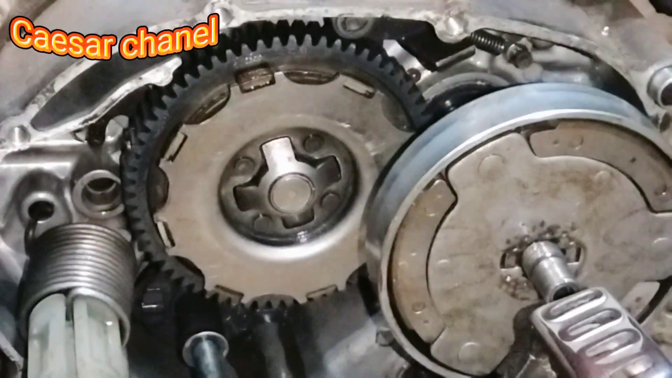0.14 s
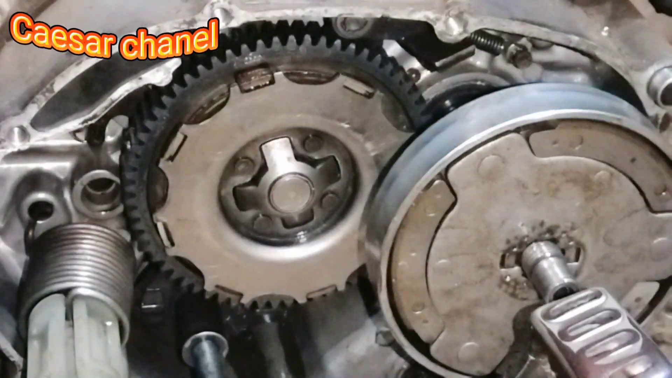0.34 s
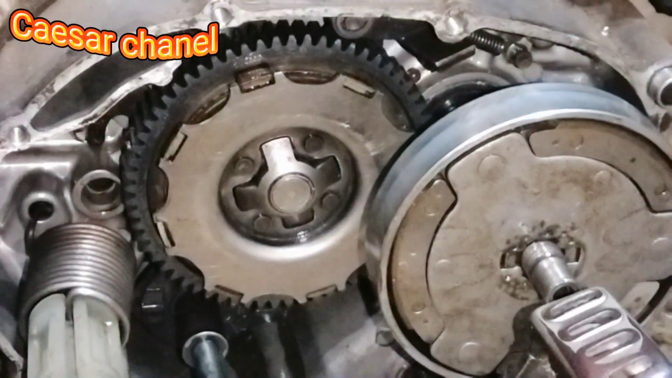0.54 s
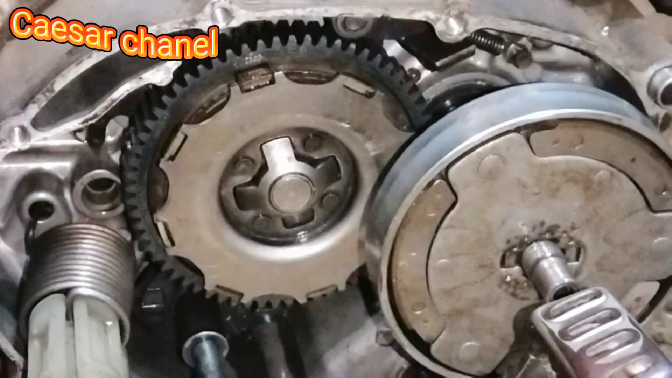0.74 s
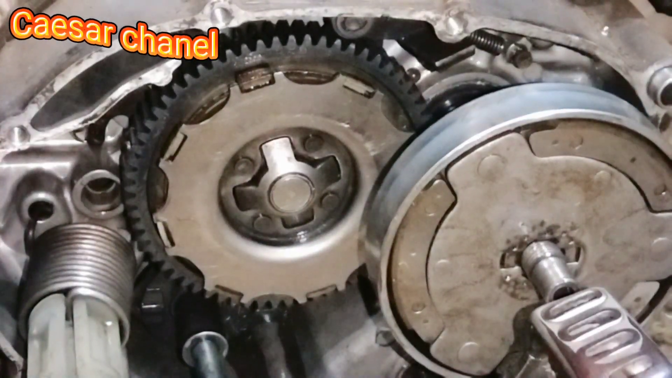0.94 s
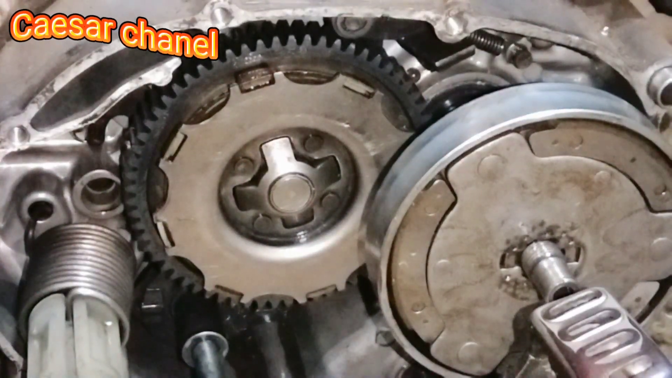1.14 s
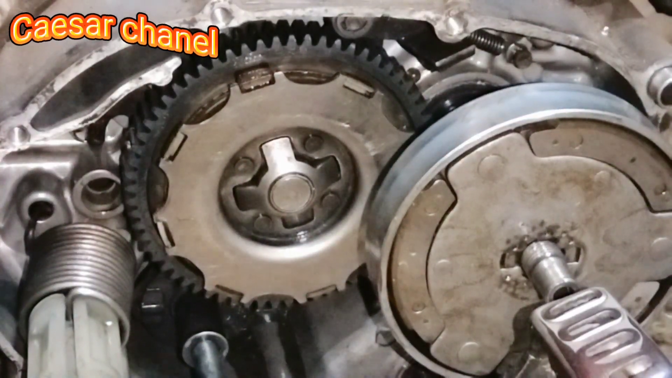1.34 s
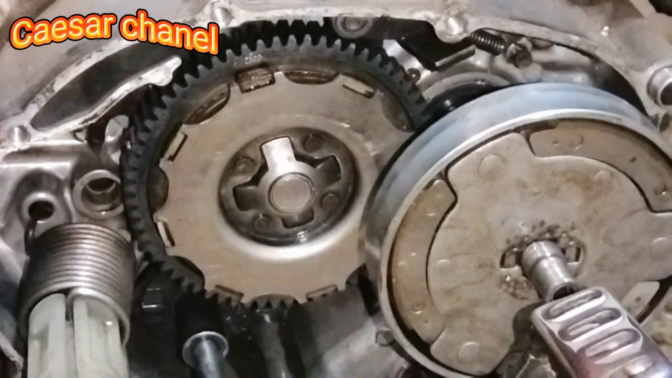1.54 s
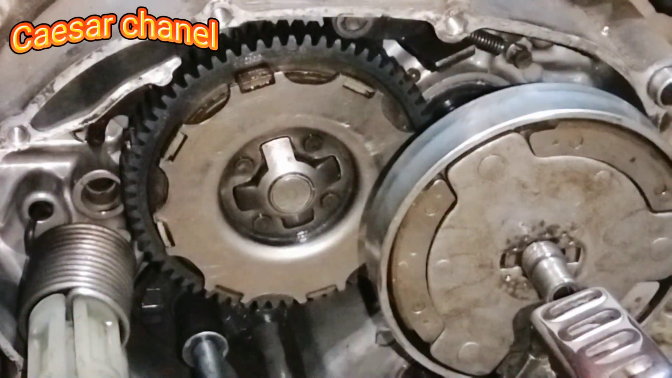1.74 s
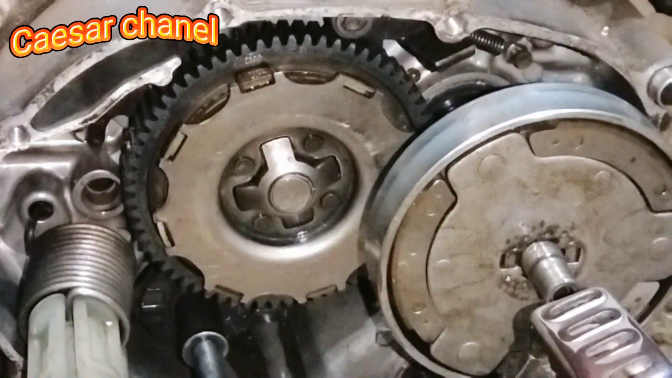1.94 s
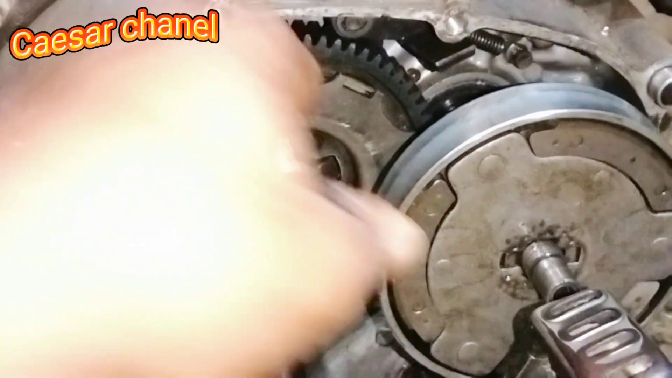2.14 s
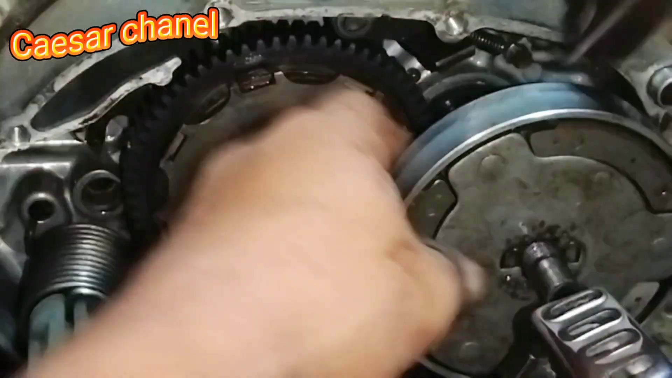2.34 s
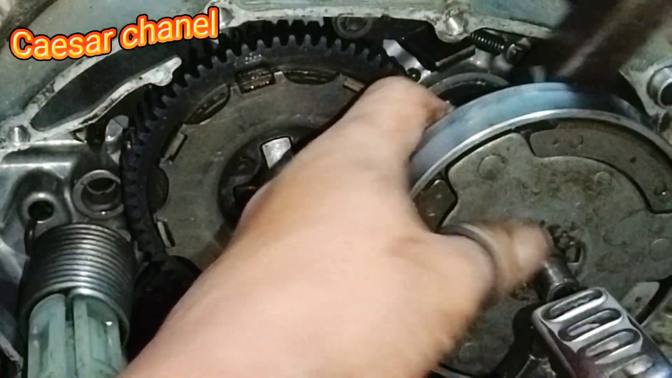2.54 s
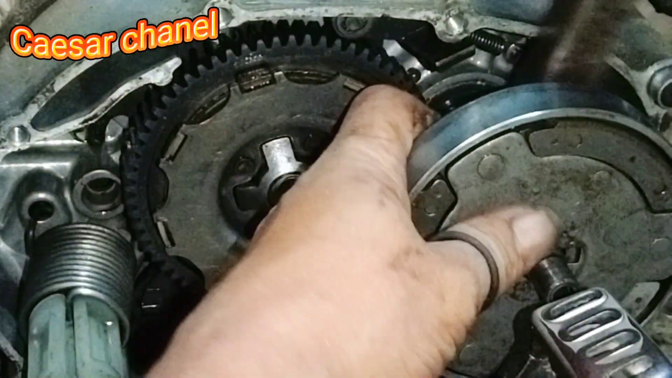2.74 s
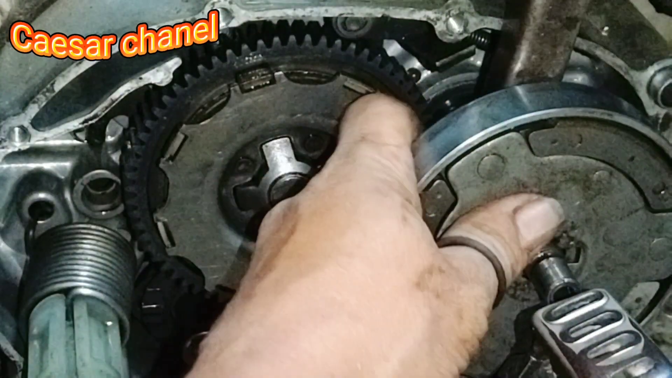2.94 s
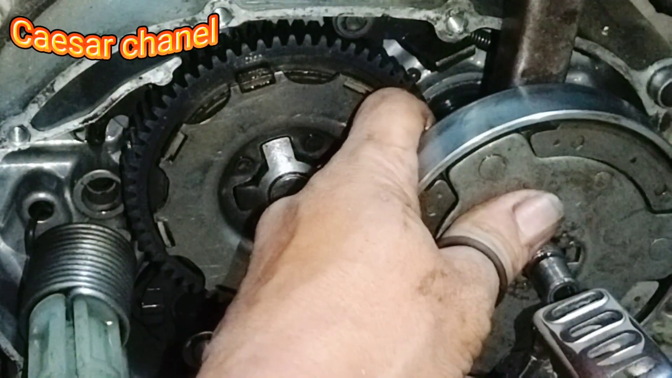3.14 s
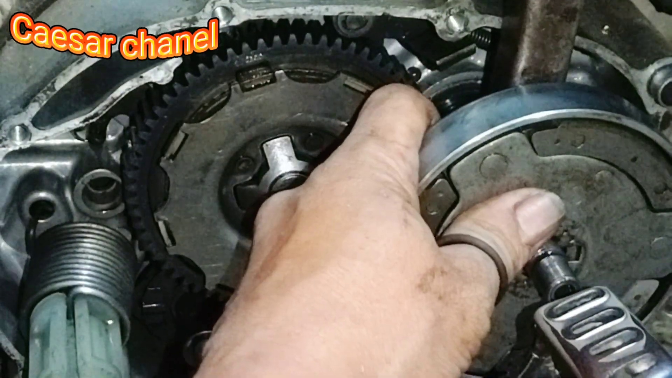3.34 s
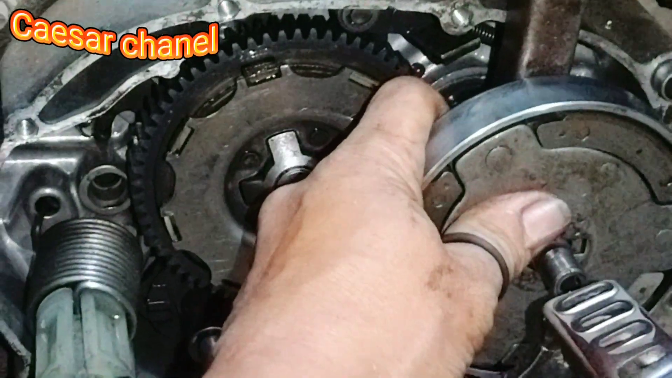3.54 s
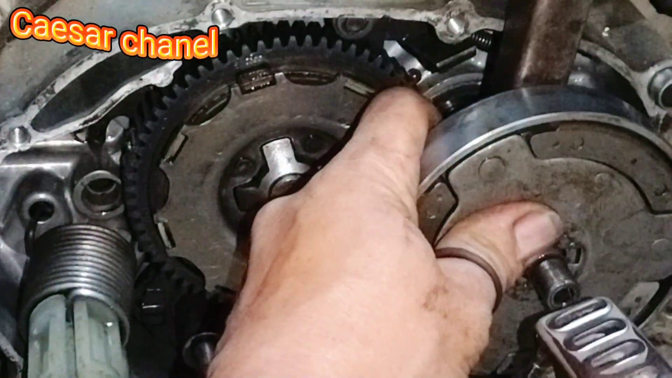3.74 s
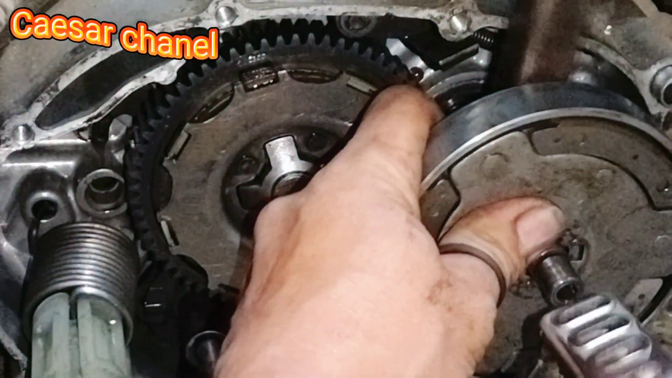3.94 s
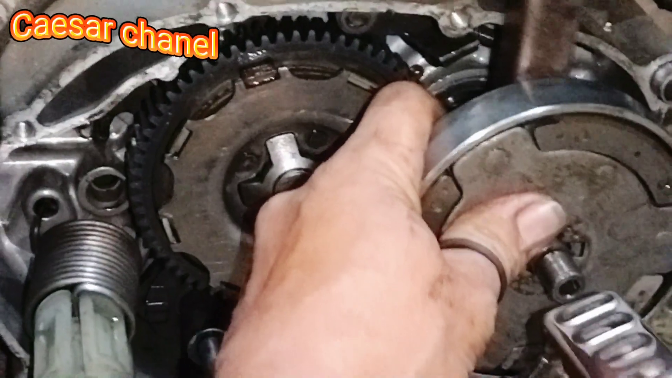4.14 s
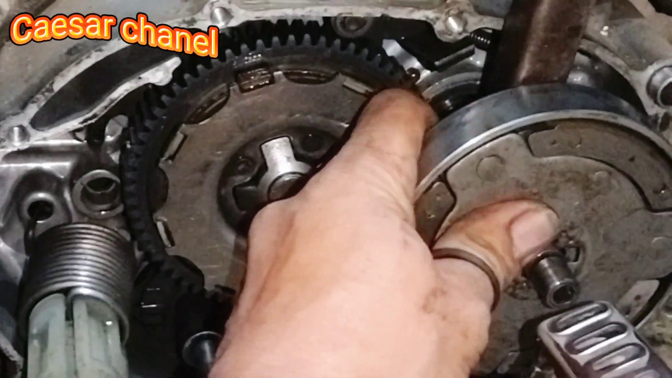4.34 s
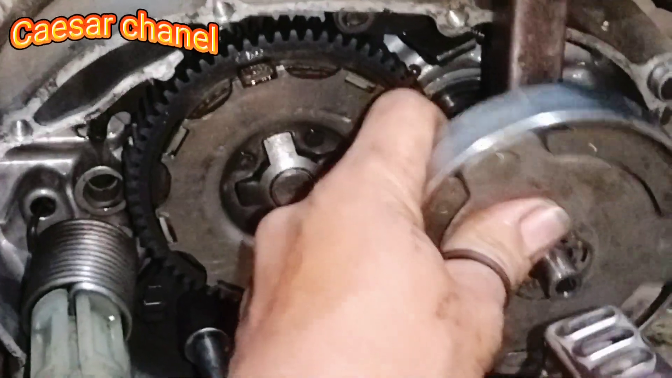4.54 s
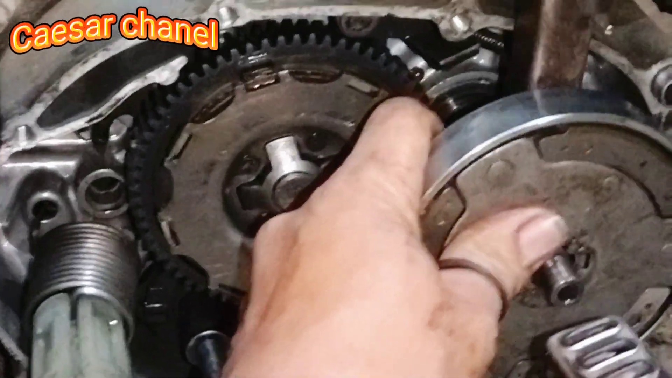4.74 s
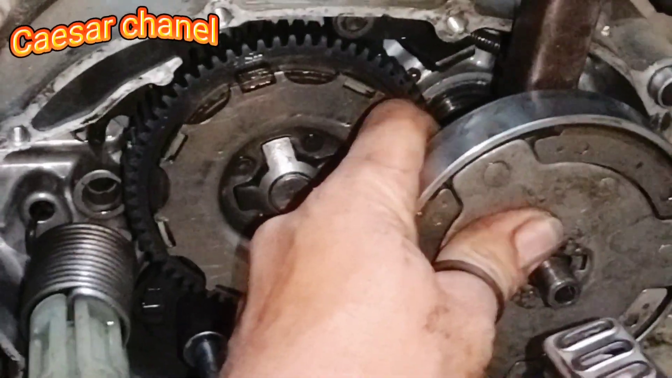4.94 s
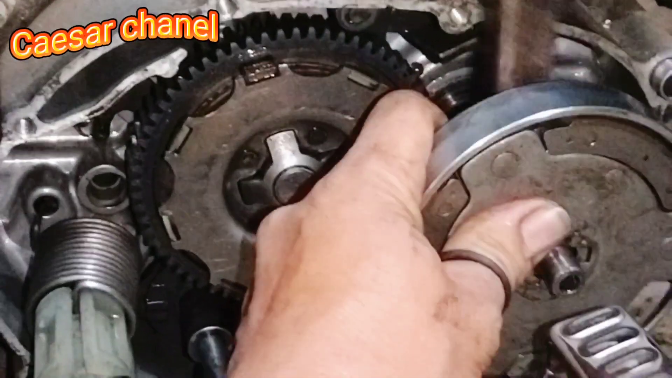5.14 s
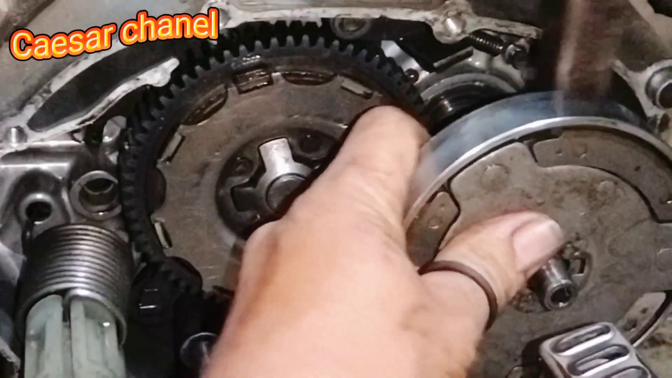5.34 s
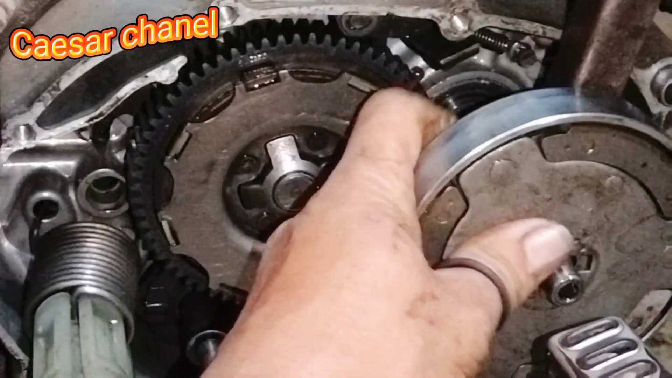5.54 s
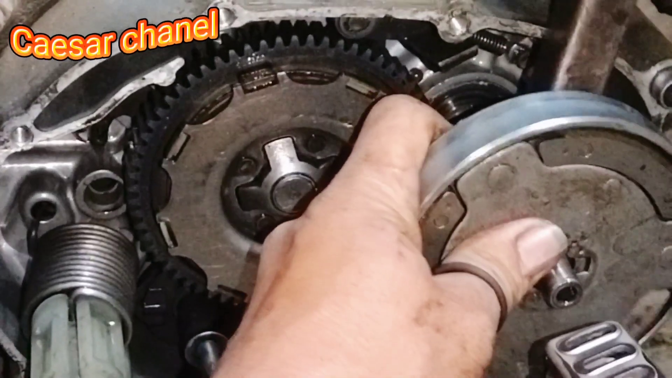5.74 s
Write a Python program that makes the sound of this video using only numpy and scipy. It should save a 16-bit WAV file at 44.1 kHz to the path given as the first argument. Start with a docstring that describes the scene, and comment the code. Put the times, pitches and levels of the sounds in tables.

```python
"""A hand and a steel lever work a clutch drum loose on an opened motorcycle engine: modal knocks and clinks.
Slips drive the drum modes as steel rubs; coloured noise makes drags, shuffles and rustling sleeves.
Further off in the shed a dropped tool is noise bursts through resonances; outside, a cricket is swelling band noise.
Faint noise streaks surface, low bumps push the microphone, and air noise lies beneath.
A phone's noise suppressor hushes the shed between the sounds."""
import sys
import numpy as np
from scipy import signal
from scipy.fft import rfft, irfft, next_fast_len
from scipy.io import wavfile
from scipy.ndimage import uniform_filter1d, minimum_filter1d, map_coordinates

SR = 44100
rng = np.random.default_rng(int(sys.argv[2]) if len(sys.argv) > 2 else 0)


def transcribe(signal):
    """Save signal, clipped to [-1, 1], as a 16-bit WAV file at the path in sys.argv[1]."""
    frames = np.atleast_2d(signal).T
    limited = np.clip(frames, -1, 1)
    pcm = np.round(limited * 32767).astype(np.int16)
    wavfile.write(sys.argv[1], SR, pcm)


N = 259899
TIME_S = np.arange(N) / SR

# Contacts of lever, drum and shaft. Each row: start in seconds, then relative levels in dB of clack, case thud,
# low drum ring, high drum ring and tick, then grip (0-1).
CONTACTS = [(2.541, -52, -55, -34.5, -29, -37, 0.44), (2.565, -48.5, -42.5, -48, -51, -68, 0.02),
            (2.599, -54, -41.5, -51, -53, -48, 0.28), (2.638, -51, -44.5, -42.5, -42.5, -49, 0.86),
            (2.677, -60.5, -50, -56, -55.5, -54.5, 0.18), (2.768, -57, -46.5, -65.5, -68, -61, 0.4),
            (2.846, -37.5, -42, -59, -61.5, -47, 0.07), (2.896, -67.5, -71, -68, -66, -40, 0),
            (2.962, -54.5, -73, -52.5, -47, -50, 0.1), (3.032, -35, -20, -52, -39.5, -44, 0.96),
            (3.064, -58, -39, -59, -50, -40, 0.7), (3.12, -48.5, -41, -61, -41, -28.5, 0.5),
            (3.168, -62, -70, -61, -49, -59, 0.5), (3.24, -99, -49.5, -50.5, -47, -50, 0.6),
            (3.259, -71, -76.5, -58.5, -58, -50, 0.24), (3.316, -50, -87.5, -54, -82, -67.5, 0.8),
            (3.33, -60, -83.5, -47, -80, -35.5, 0.56), (3.37, -65, -85.5, -60, -72, -65, 0.6),
            (3.422, -59.5, -81, -60.5, -78, -48, 0.6), (3.452, -50, -77.5, -41.5, -60.5, -62.5, 0.8),
            (3.495, -57, -73.5, -61.5, -57, -57.5, 0.73), (3.731, -66, -47.5, -53.5, -61, -94, 0.26),
            (3.758, -59, -40, -63.5, -77, -72.5, 0.3), (3.788, -55.5, -44.5, -66.5, -54, -46, 0.6),
            (3.839, -58, -47.5, -71.5, -64, -71.5, 0.8), (3.995, -69.5, -63, -77, -51, -49.5, 0.44),
            (4.013, -86.5, -45.5, -85, -87, -74.5, 0.3), (4.024, -58.5, -70, -64.5, -56.5, -39, 0.44),
            (4.0977, -35.5, -22.5, -24.5, -48, -39, 0.72), (4.109, -18, -23.5, -38, -30.5, -36, 0.6),
            (4.137, -18.5, -10, -13.5, -24.5, -19.5, 0.91), (4.139, -16.5, -23.5, -32, -43.5, -41.5, 1),
            (4.238, -26.5, -20, -46.5, -30, -45, 0.86), (4.277, -58, -48, -55.5, -52.5, -49.5, 0.4),
            (4.492, -59, -79.5, -49, -69.5, -72.5, 0.6), (4.598, -22.5, -15, -30, -27, -19.5, 0.66),
            (4.604, -17, -15, -23.5, -39.5, -32.5, 0.24), (4.632, -12.5, -7.5, -36, -24, -30, 0.66),
            (4.643, -8, -22.5, -35, -34, -38, 0.9), (4.755, -27, -21.5, -65, -53, -78, 0.2),
            (4.817, -45, -73, -63, -49, -58, 0.8), (4.889, -29.5, -35, -33, -42.5, -55.5, 0.3),
            (4.939, -59, -61.5, -72, -74, -73, 0.4), (5.101, -63.5, -79.5, -59, -67.5, -55, 0),
            (5.125, -38, -18.5, -66, -40.5, -48.5, 0.25), (5.139, -12, -36.5, -14.5, -33, -27, 0.95),
            (5.157, -19.5, -13.5, 0, -28, -17.5, 1), (5.267, -34.5, -30, -70, -58.5, -57.5, 0.3),
            (5.342, -54, -51, -62, -56, -54.5, 0.6), (5.368, -56, -56, -46, -42.5, -40, 0.3),
            (5.491, -54, -58, -69.5, -40.5, -44.5, 0.34), (5.606, -59, -53, -61, -42, -53.5, 0.8),
            (5.62, -28, -22.5, -30, -63, -98, 0.8), (5.776, -70, -73, -58, -70, -65, 0.9),
            (5.8038, -21.5, -28.5, -39, -31, -39, 0.23), (5.817, -37.5, -27.5, -29, -58, -58, 0.1),
            (5.83, -30, -55, -52, -52, -52, 0.6), (5.861, -40.5, -23.5, -46, -43, -34, 0.9)]
# Modes of drum, engine case and clutch plates. Each row: frequency in Hz, relative level in dB, ungripped t60 in seconds.
DRUM_MODES = [(2330, -14.5, .3), (3970, -12.5, 0.68), (4720, -9.5, 0.15), (4865, -12.5, 0.13),
              (5220, -6.5, 0.38), (6000, -16, .5), (6555, -16.5, .15), (7760, 3, .45), (8120, 3, .5),
              (8764, -4, 0.19), (9500, -5.5, 0.2), (10530, -6, 0.22), (12040, -10, .35), (13400, -7, 0.24),
              (14900, -15.5, 0.32), (14600, -11, .35), (15100, -10.5, 0.23)]
CASE_MODES = [(117, -14, 0.11), (286.1, -8, 0.36), (331, -9.5, 0.1), (397, 0, 0.12), (436, 1, 0.14),
              (512.4, 5, 0.059), (660.5, 1.5, 0.087), (734.7, 0, 0.13), (821.5, -2.5, 0.039)]
PLATE_MODES = [(1011, -11.5, 0.034), (1205, -5.5, 0.25), (1510, 6.5, 0.03), (1667, 11.5, 0.033),
               (1931, 8.5, 0.033), (2167, 8.5, 0.057), (2510, -7, 0.16), (2643, -5, 0.051),
               (3314, -15.5, 0.012)]
# The tool lands and settles. Each row: start in seconds, relative level in dB.
TOOL_BLOWS = [(0.553, -54), (0.564, -38), (0.576, -30), (0.5948, -12.5), (0.597, -19.5), (0.602, -28.5)]
# Tool resonances. Each row: frequency in Hz, width in Hz, level in dB.
TOOL_RESONANCES = [(1180, 43, 18), (1930, 150, 17.5), (2420, 180, -18), (2910, 230, 11), (3760, 580, 1.5),
                   (4318, 700, 4.5), (4770, 220, -1), (6240, 320, 3.5), (6280, 470, -1.5),
                   (7740, 620, -0.5), (9170, 220, -0.5)]
# Noise spectra of gritty drag, cloth, cricket and shed air. Each row: frequency in Hz, relative density in dB per Hz.
DRAG_SPECTRUM = [(88, -65.5), (150, -35.5), (277, -37), (363, -9), (620, -12.5), (1220, -7.5), (1390, -7.5),
                 (1700, -12.5), (2730, -19), (6500, -32), (8450, -53), (14300, -120)]
CLOTH_SPECTRUM = [(1500, -31), (2150, -1.5), (3000, -4.5), (5000, -5.5), (8000, -5), (12000, -10),
                  (15500, -7), (16500, -47.5)]
CRICKET_SPECTRUM = [(6300, -47.5), (6700, -10.5), (6900, -5), (7100, 2), (7350, 0), (7520, -5), (7750, -68)]
AIR_SPECTRUM = [(20, -22.5), (70, 5.5), (150, 3.5), (400, -9), (1000, -11.5), (3000, -15.5), (8000, -22.5),
                (15500, -22.5)]
# The phone's stand is nudged. Each row: time in seconds, relative level in dB.
STAND_NUDGES = [(1.52, -69.5), (1.837, -66), (2.415, -42)]
# Decay of the shed's first tail. Each row: frequency in Hz, t60 in seconds.
SHED_T60 = [(100, 0.88), (500, 0.32), (1400, 0.21), (4000, 0.27), (12000, 0.2)]
# Microphone response. Each row: frequency in Hz, gain in dB.
MIC_RESPONSE = [(30, -25.5), (100, -14), (250, -4.5), (15350, 5), (15750, -24)]
# Cloth rustles. Each row: time of the top, rise and fall in seconds, relative level in dB.
SLEEVE_STROKES = [(.002, .01, 0.15, -63.5), (.214, 0.0084, .1, -72.5), (.36, 0.15, 0.43, -61),
                  (1.842, 0.031, 0.038, -56), (1.955, 0.11, 0.17, -57), (2.08, 0.11, 0.13, -61),
                  (2.97, 0.096, .12, -62.5), (3.14, .02, 0.44, -61), (3.238, .01, 0.035, -52.5),
                  (3.33, 0.012, .1, -56.5), (3.49, 0.0097, .09, -63), (3.794, 0.076, 0.0076, -59.5),
                  (3.832, 0.022, 0.035, -69), (4.05, 0.077, 0.15, -62), (5.38, .1, .05, -68.5),
                  (5.5, 0.18, 0.037, -62), (5.62, 0.073, 0.05, -63.5)]
# Faint narrow noise bands. Each row: start and end in seconds, frequency in Hz, level in dB.
STREAKS = [(0.048, 0.087, 1586, -66.5), (0.136, 0.142, 1586, -55), (0.061, 0.062, 3210, -58),
           (0.127, 0.155, 3160, -67), (0.104, 0.301, 902, -65), (0.167, 0.307, 943, -57),
           (0.172, 0.329, 1358, -61), (0.215, .33, 1853, -58), (0.196, 0.341, 2351, -63.5),
           (0.208, 0.334, 2800, -67.5), (.47, 0.529, 1429, -53.5), (0.383, 0.561, 395, -52.5),
           (0.94, 1.137, 2088, -63), (1.046, 1.11, 1180, -58.5), (1.006, 1.088, 2984, -69.5),
           (1.286, 1.319, 2897, -71), (1.538, 1.56, 785.4, -70.5), (1.65, 1.85, 3300, -74),
           (1.834, 1.915, 433, -64.5), (2.054, 2.193, 2433, -69.5), (1.917, 2.12, 1766, -69.5),
           (2.291, 2.382, 2903, -72), (2.3, 2.467, 1343, -65), (2.315, 2.457, 1742, -69),
           (2.347, 2.428, 688.4, -61), (2.476, 2.55, 781, -59), (3.459, 3.526, 733, -57.5),
           (3.66, 3.73, 2950, -69), (3.966, 4.018, 2966, -70), (3.969, 4.02, 1550, -64.5),
           (4.886, 4.984, 2120, -49.5), (5.262, 5.587, 1007, -53.5)]
# Hand moves sliding part on part. Each row: time of the top, rise and fall in seconds, then relative levels in dB
# of gritty drag, case shuffle, low drum modes and high drum modes.
HAND_STROKES = [(.31, .008, 0.5, -49, -87.5, -93.5, -90.5), (.86, .01, 0.15, -85.5, -62, -72, -57.5),
                (.95, 0.028, .1, -91, -54.5, -63.5, -63.5), (1.05, .08, 0.083, -93, -48.5, -70, -64.5),
                (2.49, .05, .1, -91, -62, -86.5, -88), (2.65, 0.024, 0.21, -57, -54, -62, -54.5),
                (2.77, 0.007, 0.035, -52.5, -67, -66.5, -74), (2.885, 0.012, 0.19, -54, -93.5, -61, -90),
                (2.96, 0.098, 0.15, -57.5, -92.5, -62, -45.5), (3.02, 0.15, 0.2, -50, -86, -64.5, -63.5),
                (3.145, 0.0061, 0.14, -51.5, -90, -76, -75), (3.345, .01, 0.053, -77.5, -90, -92, -75),
                (3.454, 0.0077, 0.12, -58, -93, -84, -85), (3.76, 0.046, 0.09, -61, -55, -88, -69.5),
                (3.832, 0.023, 0.044, -77, -74, -67, -54.5), (4.03, 0.16, 0.23, -64, -60.5, -69, -62.5),
                (4.085, 0.04, 0.051, -64.5, -53.5, -66.5, -66), (4.31, 0.024, 0.28, -56, -67.5, -65, -62),
                (4.49, 0.043, 0.14, -58.5, -100, -68.5, -60), (4.97, 0.022, 0.16, -63, -68, -69, -66.5),
                (5.29, 0.12, 0.043, -44, -45, -64, -56), (5.4, 0.069, 0.17, -50.5, -58, -54, -47),
                (5.49, 0.032, .05, -61, -53, -58, -74), (5.6, 0.039, .03, -58, -51, -67, -48),
                (5.68, .02, 0.21, -54.5, -61.5, -80, -65)]
# Drum modes singing on alone. Each row: start and length in seconds, frequency in Hz, level in dB.
SINGING_MODES = [(1.06, .13, 4680, -72), (5.37, .2, 4700, -55), (5.37, .24, 5200, -58),
                 (5.46, .158, 3985, -55), (5.795, .11, 4740, -44)]

TOP_HZ = 16670
CRICKET_RATE_HZ, CRICKET_PEAK_S = 8.6, .113
STROKE_ROUNDNESS = 1.32  # 1 pointed, 2 bell-shaped
MUFFLE_DB_PER_GRIP, CASE_GRIP_DB_PER_S = 9, 150  # drum level loss and added case decay, per unit of grip
HARD_CLACK_DB, STOP_DB_PER_S = -35, 900  # any later clack above this level stills what was ringing


def amp(db):
    """dB to gain."""
    return 10 ** (np.asarray(db) / 20)


def unit(x):
    """Scales to rms 1."""
    return x / np.sqrt(np.mean(x ** 2) + 1e-20)


def along(points, hz):
    """Interpolates (Hz, value) points on a log axis."""
    f, v = np.transpose(points)
    return np.interp(np.log(hz + 1), np.log(f + 1), v)


def wobble(rate_hz):
    """A smooth random curve with rate_hz knots a second."""
    knots = rng.standard_normal(int(N * rate_hz / SR) + 4)
    return map_coordinates(knots, [TIME_S * rate_hz])


def filtered(x, response):
    """x times a complex response of frequency."""
    m = next_fast_len(N + SR // 2)
    spectrum = rfft(x, m) * response(np.fft.rfftfreq(m, 1 / SR))
    return irfft(spectrum, m)[..., :N]


def hiss(spectrum):
    """Coloured noise of rms 1."""
    return unit(filtered(rng.standard_normal(N), lambda hz: amp(along(spectrum, hz))))


def resonances(peaks):
    """Causal response of (Hz, width Hz, dB) resonances in alternating polarity."""
    def response(f):
        total = 0
        for k, (center, width, db) in enumerate(peaks):
            band = 1j * f * width / (center * center - f * f + 1j * f * width)
            total = total + (-1) ** k * amp(db) * band
        return total
    return response


def ring(modes, t, scatter_db, detune, damping=0, extra_db=0):
    """One blow: decaying modes with random strength and slight random detuning."""
    hz, db, t60 = np.transpose(modes)[:, :, None]
    chance = rng.standard_normal((2, len(modes), 1))
    level_db = db + extra_db + scatter_db * chance[0] - 60 * t * (1 / t60 + damping)
    tones = np.sin(2 * np.pi * hz * (1 + detune * chance[1]) * t)
    return np.sum(amp(level_db) * tones, axis=0) / np.linalg.norm(amp(db))


def strokes(rows):
    """One gain curve per level column; each stroke is 20 dB down one rise before and one fall after its top."""
    s, rise, fall, *db = np.transpose(rows)[:, :, None]
    away = np.maximum((s - TIME_S) / rise, (TIME_S - s) / fall)
    shape = amp(-20 * np.minimum(away, 10) ** STROKE_ROUNDNESS)
    return np.max(amp(db) * shape, axis=1)


def add(track, s, x):
    """Mixes x into track from time s."""
    part = track[round(s * SR):][:len(x)]
    part += x[:len(part)]


def shed(x):
    """Each frequency of the shed's answer dies at its own speed; each quarter second gets a new tail."""
    out, hop = np.zeros(N), SR // 4
    for start in range(0, N, hop):
        hz, t, z = signal.stft(rng.standard_normal(SR // 2), SR, nperseg=256)
        fall_db = 60 * t / along(SHED_T60, hz)[:, None]
        decay = amp(-fall_db) + amp(-22 - 0.3 * fall_db)  # the roof space rings on, weaker and longer
        tail = signal.istft(z * decay, SR, nperseg=256)[1]
        tail = tail / np.linalg.norm(tail)
        add(out, start / SR + .006, signal.fftconvolve(x[start:start + hop], tail))
    return out


def air():
    """Steady coloured noise of the shed air."""
    return amp(-64.0) * hiss(AIR_SPECTRUM)


def cricket():
    """A rough trill in one narrow band that swells and sinks steadily."""
    swell = np.cos(2 * np.pi * CRICKET_RATE_HZ * (TIME_S - CRICKET_PEAK_S))
    return amp(-64.5 + 4.6 * swell + .6 * wobble(3)) * hiss(CRICKET_SPECTRUM)


def streaks():
    """Each streak is a wavering band about 100 Hz wide with a quick start and a slow fade, then a fast cut."""
    out = np.zeros(N)
    for start, end, hz, db in STREAKS:
        t = np.arange(round((end - start + 0.014) * SR)) / SR
        slow = rng.standard_normal((2, len(t)))
        slow = uniform_filter1d(uniform_filter1d(slow, size=260), size=260)
        band = unit(slow[0] * np.cos(2 * np.pi * hz * t) + slow[1] * np.sin(2 * np.pi * hz * t))
        fade_db = -6 * t / (end - start) - 410 * np.maximum(t - end + start, 0)
        shape = (1 - np.exp(-t / 0.0012)) * amp(fade_db)
        add(out, start, amp(db) * shape * band)
    return out


def bumps():
    """Low damped modes push straight into the microphone."""
    out, t = np.zeros(N), np.arange(SR // 4) / SR
    modes = [(64.0, -4.0, 0.31), (109.5, 0.5, 0.15), (146.5, -16.0, 0.31)]  # Hz, dB, t60 s
    for s, db in STAND_NUDGES:
        push = ring(modes, t, 0.97, detune=0.021)
        onset = 1 - np.exp(-(t / 0.011) ** 2)
        add(out, s - .008, amp(db + 22.0) * push * onset)
    return out


def tool():
    """Short rough contacts with the floor excite the tool's resonances over a broad crash."""
    blows, t = np.zeros(N), np.arange(SR // 10) / SR
    for s, db in TOOL_BLOWS:
        add(blows, s, amp(db - 60 * t / 0.037) * rng.standard_normal(len(t)))
    crash = signal.lfilter(*signal.butter(1, [500, 3500], "band", fs=SR), blows)
    body = filtered(blows, resonances(TOOL_RESONANCES)) + amp(4.5) * crash
    return signal.lfilter(*signal.butter(2, 300, "high", fs=SR), body)


def handling():
    """A gritty drag, a dull shuffle through the case and a bright rustle of cloth, all uneven."""
    uneven = amp([2.5 * wobble(80), 3 * wobble(45), 1.2 * wobble(120)])
    drag_gain, shuffle_gain = strokes(HAND_STROKES)[:2]
    drag = drag_gain * amp(1.0) * hiss(DRAG_SPECTRUM)
    hollow = resonances([(hz, 90, db) for hz, db, t60 in CASE_MODES])
    through_case = filtered(filtered(rng.standard_normal(N), hollow), hollow)
    shuffle = shuffle_gain * unit(through_case)
    rustle = strokes(SLEEVE_STROKES)[0] * amp(2.5) * hiss(CLOTH_SPECTRUM)
    return np.sum(uneven * [drag, shuffle, rustle], axis=0)


def singing():
    """Nearly pure drum tones that swell in, waver a little and stop."""
    out = np.zeros(N)
    for start, length, hz, db in SINGING_MODES:
        fade_in = np.clip((TIME_S - start) / 0.015, 0, 1)
        fade_out = np.clip((start + length - TIME_S) / 0.015, 0, 1)
        level = amp(db + 2.5 * wobble(60))
        out += level * fade_in * fade_out * np.sin(2 * np.pi * hz * TIME_S + .6 * wobble(41))
    return out


def rubbing():
    """Steel sliding on the drum: dense tiny slips keep its modes singing and tick in the treble."""
    slips = rng.standard_normal(N) * amp(5.5 * wobble(220))
    modes = [(hz, 4.0 / t60 + .004 * hz, db) for hz, db, t60 in DRUM_MODES]
    low_gain, high_gain = strokes(HAND_STROKES)[2:]
    low = unit(filtered(slips, resonances(modes[:7])))
    high = unit(filtered(slips, resonances(modes[7:])))
    ticks = amp(-7.5) * unit(filtered(slips, resonances([(10200, 5300, 0)])))
    return low_gain * low + high_gain * (high + ticks)


def clutch():
    """Each contact clacks the plates, thuds the case, rings the drum and ticks; the gripping hand shortens the ring."""
    out, t = np.zeros(N), np.arange(SR // 3) / SR
    group = np.searchsorted([7000, 9000], np.array(DRUM_MODES)[:, 0])  # low, high, topmost
    bright = signal.butter(2, [2600, 6500], "band", fs=SR)
    hard_s = np.array([row[0] for row in CONTACTS if row[1] > HARD_CLACK_DB] + [N / SR])
    for s, clack_db, thud_db, low_db, high_db, tick_db, grip in CONTACTS:
        noise = rng.standard_normal((5, len(t)))
        chatter = amp(-60 * t / 0.032) + 0.028 * amp(-60 * t / 0.023)  # loose plates shake on after the blow
        grit = uniform_filter1d(noise[0], size=4) - uniform_filter1d(noise[0], size=40)
        plates = ring(PLATE_MODES, t, 2.5, detune=.025)
        clack = plates * chatter ** 0.18 + .5 * chatter * grit

        thud = ring(CASE_MODES, t, 3, detune=.015)
        thud = thud * amp(-CASE_GRIP_DB_PER_S * grip * t) * (1 - np.exp(-t / .001))
        thud = thud * (1 + 0.81 * unit(uniform_filter1d(noise[4], size=150)))  # random roughness in the thud

        # the topmost modes follow the hardness of the tick
        group_db = np.array([low_db + 5.0, high_db + 7.0, tick_db + 0.5])
        drum_db = group_db[group, None] - MUFFLE_DB_PER_GRIP * (grip - 0.18)
        drum = ring(DRUM_MODES, t, 2.4, detune=0.0023, damping=22 * grip, extra_db=drum_db)
        next_hard_s = hard_s[hard_s > s][0]
        drum = drum * amp(-STOP_DB_PER_S * np.maximum(t + s - next_hard_s, 0))
        drum = drum * (1 + 0.35 * unit(uniform_filter1d(noise[2], size=120)))  # random roughness in the ring

        tick = np.diff(noise[1], prepend=0) * (amp(-60 * t / 0.0023) + 0.044 * amp(-60 * t / 0.059))
        crack = signal.lfilter(*bright, noise[3]) * (amp(-60 * t / 0.0031) + 0.026 * amp(-60 * t / 0.084))
        crack_gain = amp(low_db + 3.5 - 8 * (1.5 - grip))
        blow = crack_gain * crack + amp(clack_db + 8.5) * clack + drum + amp(tick_db - 11.5) * tick

        # a contact is a short rough burst of micro-impacts, not one spike
        burst = noise[2, :200] * np.exp(-(t[:200] / 0.0016) ** 2)
        burst[0] = 9  # strong first touch
        add(out, s, signal.fftconvolve(blow, burst / np.linalg.norm(burst)))
        add(out, s, amp(thud_db + 2) * thud)
    return out


def scene():
    """Engine sounds and tool sound in the shed, the tool wetter; the rest is dry."""
    background = air() + cricket() + streaks() + bumps()
    far = tool()
    near = singing() + rubbing() + clutch()
    wet = shed(amp(-10.0) * near + amp(-5.0) * far)
    return (background + handling() + far + near + wet)[None]


def suppress(x, margin_db, depth_db, release, quorum):
    """Gates each band against its steady noise, taken from its quiet moments; opens at once, closes slowly."""
    hz, t, z = signal.stft(x, SR, nperseg=512)
    power = np.abs(uniform_filter1d(np.abs(z) ** 2, size=4, axis=1)) + 1e-20
    noise = np.percentile(power, 10, axis=1, keepdims=True)
    noise = minimum_filter1d(noise, size=17, axis=0)  # narrow songs and hums are not taken for noise
    gain = np.clip(1 - amp(2 * margin_db) * noise / power, 0, 1)
    # many bands standing out together open all
    together = np.clip(np.mean(gain, axis=0) / quorum, 0, 1) ** 2
    gain = np.maximum(gain, together)
    least = amp(depth_db * np.clip(hz / 500, .4, 1))[:, None]  # the bass is hushed less
    for k in range(1, len(t)):
        gain[:, k] = np.maximum(gain[:, k], release * gain[:, k - 1])
    return signal.istft(z * np.maximum(gain, least), SR, nperseg=512)[1][:N]


def record(dry):
    """Suppressor, microphone colour, soft overload and band limit."""
    x = suppress(dry[0], margin_db=13.0, depth_db=-19.5, release=0.96, quorum=0.55)
    x = filtered(x, lambda hz: amp(along(MIC_RESPONSE, hz)))
    x = x / (1 + np.abs(x) ** 6) ** (1 / 6)
    return filtered(x, lambda hz: hz < TOP_HZ)[None]


dry = scene()
out = record(dry)
transcribe(out)
```